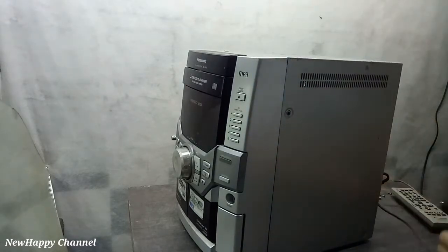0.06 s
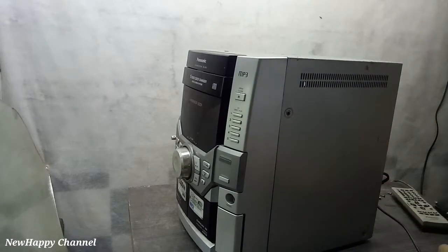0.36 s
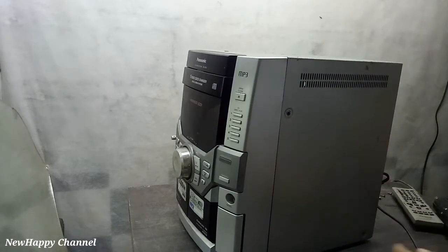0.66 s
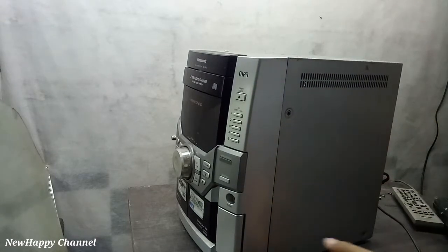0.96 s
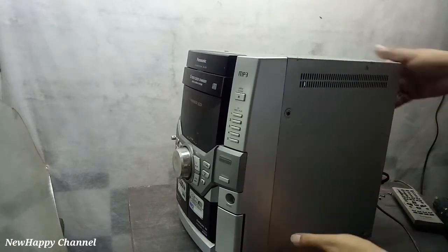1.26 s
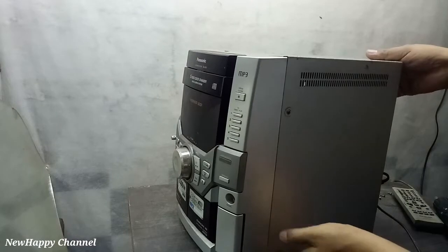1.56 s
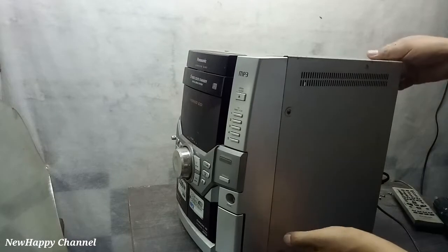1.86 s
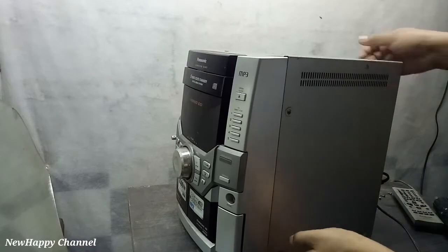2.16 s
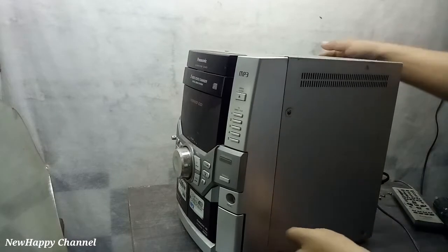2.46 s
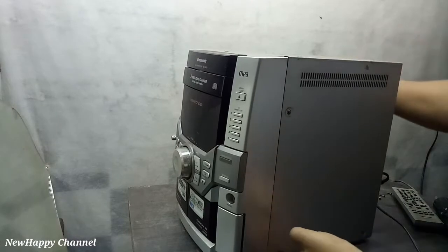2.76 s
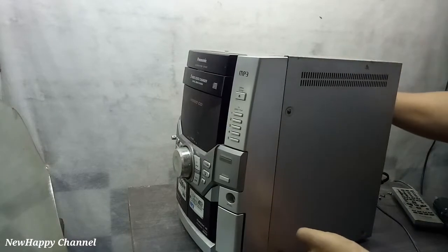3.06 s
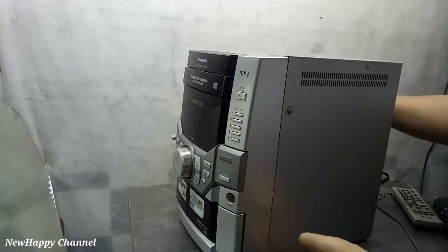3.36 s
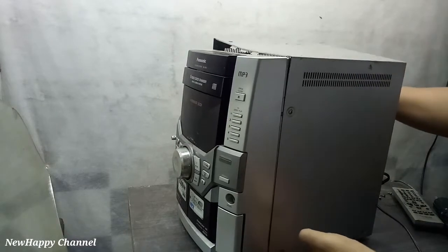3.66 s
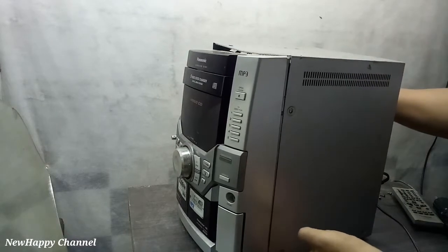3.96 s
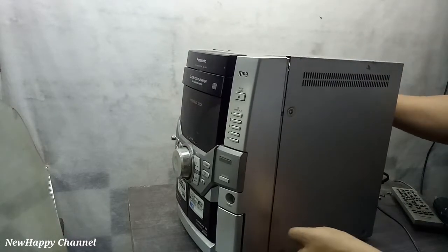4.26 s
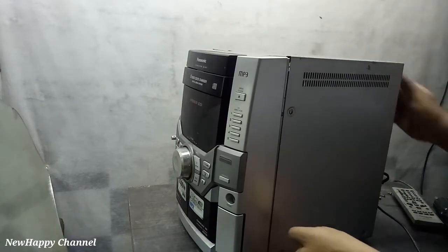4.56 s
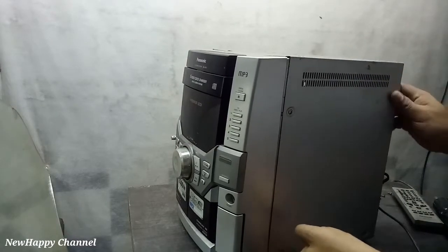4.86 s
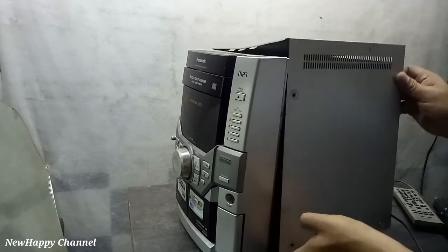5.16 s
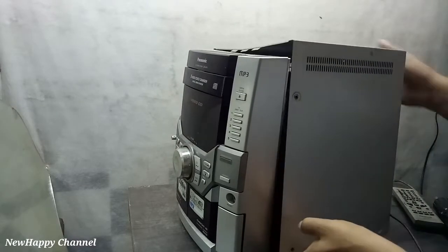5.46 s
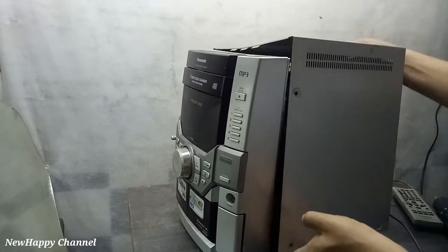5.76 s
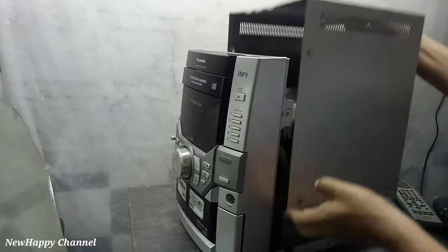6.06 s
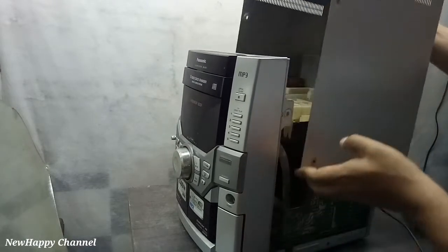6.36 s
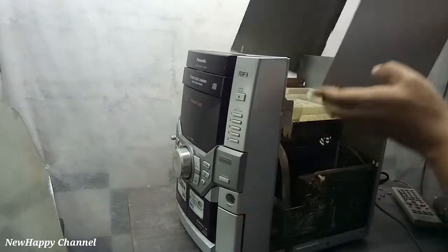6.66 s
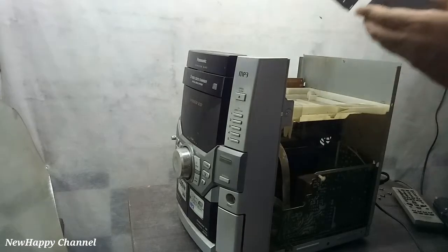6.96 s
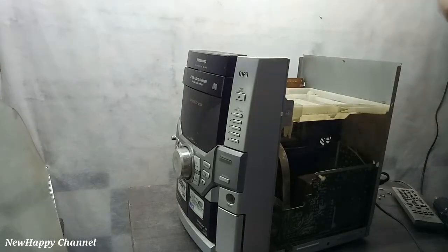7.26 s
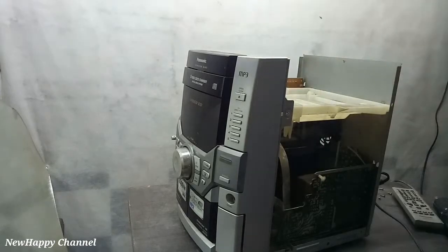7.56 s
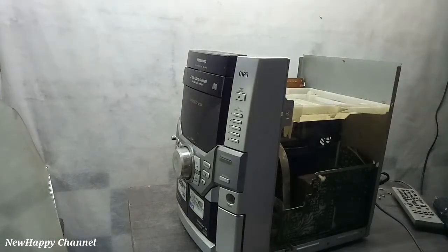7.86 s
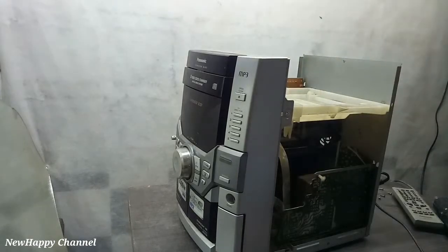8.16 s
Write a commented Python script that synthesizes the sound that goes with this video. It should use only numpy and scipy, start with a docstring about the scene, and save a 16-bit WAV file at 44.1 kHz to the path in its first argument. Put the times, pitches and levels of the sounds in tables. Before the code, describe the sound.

In a small, hard-walled room, something is set down on a workbench with a few knocks. Hands rub softly over a thin sheet-steel cabinet cover, then tug it so that it clanks and rattles in bursts, once leaving a panel singing. The cover breaks free, grates up the chassis, swishes clear and rings briefly with a low wobble. The sounds are close, slightly to the right, over faint room tone.

```python
"""A thin sheet-steel cover is worked loose from a cabinet on a workbench in a small, hard-walled room.
First something is put down, knocking on the bench; hands rub the cover and a fingertip squeaks.
From about 2.3 s the cover is tugged and clanks against its catches, plucking a chassis panel at 4.4 s.
At 6 s its edges break free and grate up the chassis, then it swishes over the back plate.
Just before 7 s it comes clear, flexes in the hands and rings on in the air over faint room tone."""
import sys
import numpy as np
from scipy import signal
from scipy.fft import rfft, irfft, next_fast_len
from scipy.io import wavfile
from scipy.ndimage import map_coordinates

SR = 44100
rng = np.random.default_rng(int(sys.argv[2]) if len(sys.argv) > 2 else 0)


def put_to_file(sound):
    """Save the sound as 16-bit audio at rate SR, in the file named by the first command-line argument."""
    columns = np.atleast_2d(sound).T  # one column per channel
    safe = np.clip(columns, -1, 1)
    whole_steps = np.round(safe * 32767)
    wavfile.write(sys.argv[1], SR, whole_steps.astype(np.int16))


N = 370877

# the cover's longest modes when it hangs free: f/Hz, level/dB, t60/s
COVER_MODES = [(231, -3, .7), (309, -2, .4), (354, -5, .35), (426, -2, .35), (561, -2, .6), (625, -3, .4),
               (787, -4, .4), (957, -3, .4), (1082, -10, .9), (1193, -3, .35), (1358, -13, 1.4),
               (1572, -5, .35), (1820, -5, .35), (1993, -1, .35), (2105, -7, .95), (2157, -5, .7),
               (2287, -4, .95), (2466, -7, .5), (2657, -5, .45), (2723, -5, .4), (2864, -7, .6),
               (3125, -9, .7), (3289, -8, .55)]
# EQ of the struck sheet: f/Hz, level/dB
STEEL_EQ = [(30, -46.5), (55, -25), (110, -9.5), (160, -3.5), (195, -9), (230, -1.5), (305, 0.5),
            (490, -10.5), (570, -13.5), (660, -14), (780, -9), (1200, -12), (1600, -14), (2600, -10.5),
            (3800, -24), (5200, -29.5), (6700, -34), (8200, -46.5), (15000, -52)]
# the cover hits the chassis: t/s, knock level before trim/dB, thump re knock/dB, clank re knock/dB,
# knock f/Hz, crash t60/s
COVER_BLOWS = [(1.744, -54.5, 4, 13.5, 1384, 0.064), (2.348, -42, -12, 10.5, 963, .33),
               (2.565, -48.5, -7, 0.5, 1170, 0.17), (2.586, -19.5, -5, -10.5, 1200, 0.27),
               (2.856, -46.5, -14, 1, 1160, 0.4), (3.002, -35, -5, -6.5, 950, 0.15),
               (3.535, -38.5, -1, 2, 1460, 0.14), (3.547, -27.5, -9.5, 4.5, 794, 0.15),
               (3.556, -15, -2, -2, 1195, 0.29), (3.66, -13.5, 0.5, -5.5, 890, 0.32),
               (3.691, -21, 2, -2, 1340, 0.079), (3.879, -40, -6.5, -10, 557, 0.17),
               (4.105, -34, 20, -21, 590, .1), (4.148, -22.5, 2, -8, 500, 0.2),
               (4.161, -11, 0.5, -11, 450, 0.31), (4.224, -14.5, -1, -10.5, 600, 0.29),
               (4.356, -19.5, -2, -5.5, 960, .22), (4.379, -6.5, -2.5, -6.5, 535, 0.059),
               (4.397, -14, -28, 0.5, 544, 0.2), (4.424, -15, 0, -1, 582, 0.56),
               (4.715, -26, -4.5, -8, 478, 0.22), (5.088, -30, 1.5, -4.5, 1410, 0.43),
               (5.172, -11, -8, -9, 1060, 0.17), (5.217, -12, -11.5, -4.5, 1080, .17),
               (5.235, -15.5, -2.5, -14, 980, 0.59), (5.449, -12.5, 4, -10, 452, .15),
               (5.472, -15.5, -13, -6, 627, 0.47), (6.028, -25.5, -15, -4, 1310, 0.29),
               (6.055, -10.5, -13.5, 2, 1180, 0.25), (7.198, -54.5, -2, 5.5, 1360, 0.24)]


def cover_blows():
    """A crack at the contact and a crash of crowded plate modes; hands and chassis damp the long modes."""
    out, t = np.zeros(N), np.arange(SR * 2 // 3) / SR
    trim_db, spot_spread = -12, 0.083  # spread: share by which resonances shift with the struck spot
    modes = ringing(COVER_MODES, t, damping=1.61)
    crowd = crowded_modes(t, t60_at_2khz=0.36)
    boom = norm(bench_boom(t))
    for s, db, thump_db, clank_db, knock_hz, crash_t60 in COVER_BLOWS:
        contact = burst(t, t60=0.015) + amp(-2.5) * burst(t, t60=crash_t60) + amp(-18) * excited(crowd)
        contact *= 1 - np.exp(-t / 0.0027)  # a glancing edge bites gradually
        blow = norm(coloured(uneven(contact, depth_db=3), STEEL_EQ)) + amp(-10.5) * excited(modes)
        blow += amp(-18) * boom  # the cabinet passes the shock on to the bench
        thump_hz, clank_hz = np.array([307, 1920]) * np.exp(spot_spread * rng.standard_normal(2))
        blow = resonant(blow, [thump_hz, knock_hz, clank_hz], q=12, boost=1)
        sound = in_room(blow, wet_db=-4, build_s=0.0075)
        sizzle_db = -46.5 + grown(db + clank_db) - db
        add(out, s, voiced(sound, db + trim_db, thump_db, clank_db, sizzle_db, skid_s=0.0075))
    return out


def crowded_modes(t, t60_at_2khz, count=150):
    """The sheet's many lesser modes, dying sooner the higher they lie."""
    hz = 500 + 13000 * ((np.arange(count) + rng.random(count)) / count) ** 2
    return ringing([(f, 0, t60_at_2khz * (f / 2000) ** -.15) for f in hz], t)


# EQ of a grating steel edge and of sheet sliding on sheet: f/Hz, level/dB
GRATE_EQ = [(30, -44.5), (70, -18), (120, -10), (190, -12.5), (260, -8.5), (370, 1), (480, -8.5),
            (580, -2.5), (760, -13), (1200, -9.5), (1650, -15), (2050, -12), (3400, -20.5), (5200, -29),
            (6600, -30.5), (8500, -37.5), (15000, -40)]
SWISH_EQ = [(35, -53.5), (100, 6), (230, -8), (335, -11), (560, -19.5), (950, -13.5), (1570, -6), (2400, 2),
            (3300, -1.5), (5300, -15.5), (6700, -16.5), (9000, -23), (15000, -21.5)]
# band mix, a row each for thump, knock, clank, sizzle: level/dB, growth/(dB per dB of pressure or speed)
GRATE_MIX = [(-22, 1.5), (-21.5, 1.15), (-20, 1.24), (-38.5, 2.07)]
SWISH_MIX = [(-55, 0.4), (-32, 1), (-25.5, 1.5), (-37.5, 1.67)]


def lift_scrape():
    """The edges break loose and grate ever more lightly; the cover then swishes over the back plate."""
    out, t = np.zeros(N), np.arange(5.9, 7.5, 1 / SR)
    pressure_db = swell(t - 6.07, hold_s=0.27, rise_s=0.092, release_s=0.76, sag_db_per_s=17.5)
    speed_db = swell(t - 6.83, hold_s=0.067, rise_s=1, release_s=0.47, sag_db_per_s=23)
    grate = [amp(db + growth * pressure_db) for db, growth in GRATE_MIX]
    swish = [amp(db + growth * speed_db) for db, growth in SWISH_MIX]
    add(out, t[0], friction(grate, GRATE_EQ, slips_per_s=1200, spread_db=5.5, ring_db=-9))
    add(out, t[0], friction(swish, SWISH_EQ, slips_per_s=2600, spread_db=2, ring_db=-24))
    return out


def friction(band_gains, eq, slips_per_s, spread_db, ring_db, hop=3072):
    """Uneven little slips ring the sheet, and other modes answer as the contact travels."""
    t, grain = np.arange(SR // 4) / SR, 2 * hop
    modes = ringing(COVER_MODES, t, damping=0.83)
    sound = np.zeros(len(band_gains[0]) + grain)
    for start in range(0, len(sound), hop):
        slips = (rng.random(grain) < slips_per_s / SR) * amp(spread_db * rng.standard_normal(grain))
        slips = norm(slips * rng.choice([-1, 1], grain) * np.hanning(grain))
        crash = uneven(burst(t, t60=0.0095) + amp(-2.5) * burst(t, t60=0.096), depth_db=1)
        plate = norm(coloured(crash, eq)) + amp(ring_db) * excited(modes)
        add(sound, start / SR, signal.fftconvolve(slips, plate))
    sound = in_room(sound, wet_db=-0.5, build_s=.01)
    return sum(gain * unit(band[grain:]) for gain, band in zip(band_gains, split_bands(sound)))


# the chassis panel's ring: f/Hz, level/dB, t60/s
PANEL_MODES = [(230, -29, 0.94), (460, -48.5, 4.6), (550, -43, 0.77), (730, -23.5, 1.53), (787, -31, 1.3),
               (1037, -32, 1.14), (2370, -36, .55), (2540, -25.5, .6), (2622, -30.5, 0.36)]


def panel_pluck():
    """The cover plucks a chassis panel as it slips past, and the undamped steel sings on."""
    out, t = np.zeros(N), np.arange(SR) / SR
    fade_out = np.minimum(1, (1 - t) / .2)
    add(out, 4.385, amp(-0.5) * ringing(PANEL_MODES, t).sum(axis=0) * fade_out)
    return out


# the freed cover is set ringing: t/s, level/dB
FREE_RINGS = [(6.849, 1.5), (7.199, -29)]


def free_rings():
    """Held in the air, the cover rings on; its pitches waver as the sheet flexes."""
    out, t = np.zeros(N), np.arange(SR) / SR
    attack = 1 - np.exp(-t / 0.006)
    for s, db in FREE_RINGS:
        sway = map_coordinates(rng.standard_normal(40), [t * 25])
        bent_time = t + np.cumsum(.003 * sway) / SR
        ring = excited(ringing(COVER_MODES, bent_time), scatter_db=2)
        add(out, s, amp(db) * in_room(ring * attack, wet_db=-4.5, build_s=0.019))
    return out


# the loose sheet wobbles in the hands: t/s, hold/s, f/Hz, level/dB
FLEXES = [(6.855, 0.045, 230.5, -33), (7.01, 0.058, 229, -44), (7.11, 0.041, 151, -48),
          (7.21, .11, 159.6, -54)]


def sheet_flexes():
    """Each flex sounds a low bending note that sinks as the sheet's sides relax."""
    out, t = np.zeros(N), np.arange(-.05, .3, 1 / SR)
    sink_hz_per_s = 230
    for s, hold_s, hz, db in FLEXES:
        level_db = db + swell(t, hold_s, rise_s=0.017, release_s=0.043, sag_db_per_s=27)
        note = np.sin(2 * np.pi * np.cumsum(hz - sink_hz_per_s * t) / SR)
        add(out, s + t[0], amp(level_db) * note)
    return in_room(out, wet_db=-11, build_s=0.007)


# EQ of the bench top: f/Hz, level/dB
BENCH_EQ = [(29, -60.5), (50, -42.5), (113, -6), (196, -0.5), (227, 0), (310, 2), (413, -9), (538, -25),
            (607, -16.5), (981, -19.5), (1190, -11), (1590, -21), (2380, -21), (7920, -76), (15500, -65.5)]
# its short ring: f/Hz, level/dB, t60/s
BENCH_MODES = [(397, 1.5, 0.19), (577, 0.5, 0.075), (1174, -1, 0.13), (1570, -13.5, .08)]
# hits on the bench: t/s, knock level before trim/dB, thump re knock/dB, clank re knock/dB,
# sizzle re knock/dB, knock f/Hz
BENCH_KNOCKS = [(0.156, -11.5, -10, -16, -63, 676), (0.252, -23, -15, -10.5, -54, 640),
                (0.565, -25.5, -1, -15.5, -59, 1250), (0.588, -27, 4, -7.5, -59, 520),
                (0.684, -8, -5, -13, -31.5, 616.5), (0.721, -21.5, 1, -16, -51, 464)]


def bench_knocks():
    """Tight knocks on the bench top, which then booms briefly under its load."""
    out, t = np.zeros(N), np.arange(SR * 2 // 3) / SR
    trim_db, thump_hz = -7.5, 437
    modes = ringing(BENCH_MODES, t)
    for s, db, thump_db, clank_db, sizzle_db, knock_hz in BENCH_KNOCKS:
        contact = burst(t, t60=0.048) + amp(-6) * burst(t, t60=.13)
        blow = norm(coloured(uneven(contact, depth_db=2.5), BENCH_EQ)) + amp(-13.5) * excited(modes)
        blow = resonant(blow, [thump_hz, knock_hz], q=5.6, boost=2.6)
        sound = in_room(blow, wet_db=-5, build_s=0.015)
        add(out, s, voiced(sound, db + trim_db, thump_db, clank_db, sizzle_db, skid_s=.0003))
        boom_db = -49 + grown(db + thump_db)
        add(out, s, amp(boom_db) * in_room(bench_boom(t), wet_db=-7.5, build_s=0.02))
    return out


def bench_boom(t, hz=120):
    """The bench top bounces as a whole under a blow, over in a few cycles."""
    attack = 1 - np.exp(-t / 0.014)
    return unit(np.sin(2 * np.pi * hz * t) * amp(-60 * t / 0.084) * attack)


# EQ of fingers on the cover: f/Hz, level/dB
SKIN_EQ = [(35, -63.5), (60, -22), (191, -19), (280, 1), (396, -6), (428, -7.5), (642, -12.5), (825, -12.5),
           (1060, -14.5), (1170, -9.5), (1260, -20), (2470, -14), (6000, -63.5), (7800, -86.5),
           (13200, -120)]
# hand moves: full-pressure t/s, hold/s, knock level/dB, thump re knock/dB, clank re knock/dB
HAND_RUBS = [(0.381, 0.14, -51.5, 9.5, -6.5), (1.371, 0.14, -36.5, 0, -10), (1.641, 0.099, -63.5, 8.5, 0.5),
             (2.881, 0.15, -55, -22, -2), (3.041, 0.1, -67.5, 27.5, 9.5), (3.357, 0.036, -69, 10, 2),
             (3.751, 0.092, -34.5, 4, -9.5), (3.894, 0.0042, -34.5, 1, -8.5),
             (4.544, 0.21, -37, -1.5, -8.5), (4.893, .14, -46.5, -11.5, -4.5), (5.14, .03, -41.5, 8, -5),
             (5.732, 0.11, -72.5, 4, 14.5), (5.866, 0.013, -63.5, 9.5, -6), (6.574, .06, -49, 0, 2),
             (8.252, 0.045, -67, -3, 5.5)]


def hand_rubs():
    """Hands shift on the cover and ease it along its seat: soft friction with no sizzle band."""
    out, t = np.zeros(N), np.arange(-.12, .36, 1 / SR)
    for s, hold_s, db, thump_db, clank_db in HAND_RUBS:
        pressure_db = db + swell(t, hold_s, rise_s=0.17, release_s=0.27, sag_db_per_s=46.5)
        gains = [amp(pressure_db + band_db) for band_db in (thump_db, 0, clank_db)]
        add(out, s + t[0], friction(gains, SKIN_EQ, slips_per_s=480, spread_db=1, ring_db=-15.5))
    return out


# a fingertip squeaks on the steel: t/s, hold/s, level/dB
SQUEAKS = [(1.058, 0.039, -68.5), (1.319, .015, -51.5)]


def finger_squeaks(hz=2870, jitter=0.0299):
    """Skin sticks and slips fast and a little unevenly, giving a thin rough tone."""
    out, t = np.zeros(N), np.arange(-.1, .25, 1 / SR)
    for s, hold_s, db in SQUEAKS:
        waver = map_coordinates(rng.standard_normal(150), [(t - t[0]) * 400])
        tone = np.sin(2 * np.pi * np.cumsum(hz * (1 + jitter * waver)) / SR)
        level_db = db + swell(t, hold_s, rise_s=0.19, release_s=.2, sag_db_per_s=46.5)
        add(out, s + t[0], amp(level_db) * tone)
    return in_room(out, wet_db=-1, build_s=0.0092)


# reverb decay: f/Hz, t60/s
ROOM_DECAY = [(80, 0.23), (250, 0.42), (700, 0.22), (2500, 0.27), (5000, 0.57), (12000, 0.033)]


def in_room(x, wet_db, build_s):
    """x plus a fresh diffuse tail, which builds up as the near walls answer."""
    hz, t, noise = signal.stft(rng.standard_normal(SR // 2), SR, nperseg=256)
    decay = amp(-60 * t / along(ROOM_DECAY, hz)[:, None])
    tail = signal.istft(noise * decay, SR, nperseg=256)[1]
    tail *= 1 - np.exp(-(np.arange(len(tail)) / SR / build_s) ** 2)
    return x + amp(wet_db) * signal.fftconvolve(x, norm(tail))[:len(x)]


# EQ of the background bed: f/Hz, level/dB
ROOM_TONE_EQ = [(15, -60.5), (25, -26), (69, -5), (156, -7.5), (274, -12), (378, -10.5), (509, -21),
                (567, -14), (741, -21.5), (804, -18.5), (1050, -22), (2850, -25.5), (3830, -27.5),
                (4620, -36.5), (15500, -44)]


def room_tone():
    """A faint steady rush under everything."""
    return amp(-65) * unit(coloured(rng.standard_normal(N), ROOM_TONE_EQ))


# the thump, knock, clank and sizzle bands: low f/Hz, high f/Hz
BANDS = [(30, 450), (450, 1500), (1500, 4250), (4600, 17000)]


def split_bands(x):
    """x split into thump, knock, clank and sizzle."""
    return [signal.sosfilt(signal.butter(5, band, "bandpass", fs=SR, output="sos"), x) for band in BANDS]


def voiced(sound, db, thump_db, clank_db, sizzle_db, skid_s):
    """The hardness of a contact sets each band's level in the first 30 ms; the sizzle dies first."""
    t, onset = np.arange(len(sound)) / SR, SR * 3 // 100
    thump, knock, clank, sizzle = split_bands(sound)
    sizzle *= amp(-60 * t / 0.3)
    sizzle *= 1 - np.exp(-t / skid_s)  # it builds up while the contact skids
    gains = amp(db + np.array([thump_db, 0, clank_db, sizzle_db]))
    return sum(g * band / np.std(band[:onset]) for g, band in zip(gains, [thump, knock, clank, sizzle]))


def ringing(table, t, damping=1):
    """One dying sine for each mode: f/Hz, level/dB, t60/s."""
    return np.array([amp(db - 60 * damping * t / t60) * np.sin(2 * np.pi * hz * t)
                     for hz, db, t60 in table])


def excited(modes, scatter_db=3):
    """Every contact point drives the modes with its own strengths and signs."""
    strengths = amp(rng.normal(0, scatter_db, len(modes)))
    signs = rng.choice([-1, 1], len(modes))
    return norm((strengths * signs) @ modes)


def burst(t, t60):
    """A dying puff of noise: many short modes at once."""
    return norm(rng.standard_normal(len(t)) * amp(-60 * t / t60))


def uneven(x, depth_db, step_hz=130):
    """Each contact point favours its own patches of the spectrum."""
    hz = np.arange(0, SR / 2, step_hz)
    ripple_db = depth_db * rng.standard_normal(400)[:len(hz)]
    return coloured(x, np.column_stack([hz, ripple_db]))


def resonant(x, centres_hz, q, boost):
    """The spot that is struck stresses a few broad resonances."""
    return x + boost * sum(signal.lfilter(*signal.iirpeak(hz, q, SR), x) for hz in centres_hz)


def swell(t, hold_s, rise_s, release_s, sag_db_per_s):
    """Envelope in dB of one move: it peaks at t = 0 and sags while held; rise and release span 60 dB."""
    rise = np.maximum(-t, 0) / rise_s
    release = np.maximum(t - hold_s, 0) / release_s
    return -60 * (rise + release) - sag_db_per_s * np.clip(t, 0, hold_s)


def grown(db, growth=1.25, pivot_db=-21.5):
    """Gain in dB of a layer that grows faster than the blow itself."""
    return growth * (db - pivot_db)


def coloured(x, points):
    """x through a minimum-phase EQ: f/Hz, level/dB."""
    n = x.shape[-1]
    m = 2 * next_fast_len(n // 2 + 2048)
    gains = amp(along(points, np.fft.rfftfreq(m, 1 / SR)))
    cepstrum = irfft(np.log(gains + 1e-6))
    cepstrum[1:m // 2] *= 2
    cepstrum[m // 2 + 1:] = 0
    return irfft(rfft(x, m) * np.exp(rfft(cepstrum)), m)[..., :n]


def along(points, hz):
    """Reads a curve of (f/Hz, value) points on a log axis."""
    f, v = np.transpose(points)
    return np.interp(np.log(hz + 1), np.log(f + 1), v)


def add(track, s, sound):
    """Mixes a sound into the track at time s."""
    part = track[max(round(s * SR), 0):][:len(sound)]
    part += sound[:len(part)]


def amp(db):
    """Decibels to gain."""
    return 10 ** (np.asarray(db) / 20)


def unit(x):
    """Scaled to rms 1."""
    return x / np.sqrt(np.mean(x ** 2) + 1e-20)


def norm(x):
    """Scaled to energy 1."""
    return x / np.sqrt(np.sum(x ** 2) + 1e-20)


# stereo balance: f/Hz, left minus right/dB
BALANCE = [(60, -4), (200, -4.5), (700, -3.5), (1300, -3), (2400, 0.1), (4400, -1), (8000, -1.04)]
# diffuse stereo width: f/Hz, side level/dB
WIDTH = [(100, -26), (400, -27.5), (1100, -11.5), (2200, -22.5), (4000, -12), (7000, -20), (14000, -29)]


def scene():
    """The mix: lows and mids lean right; wall reflections differ a little between the sides."""
    mid = (bench_knocks() + cover_blows() + hand_rubs() + finger_squeaks() + lift_scrape()
           + panel_pluck() + free_rings() + sheet_flexes() + room_tone())
    scatter = burst(np.arange(SR // 4) / SR, t60=.16)
    side = coloured(signal.fftconvolve(mid, scatter)[:N], WIDTH)
    left = coloured(mid, [(hz, db / 2) for hz, db in BALANCE])
    right = coloured(mid, [(hz, -db / 2) for hz, db in BALANCE])
    return np.array([left + side, right - side])


def record(dry):
    """Soft clipping at full scale, then a brick-wall low-pass."""
    clipped = dry / (1 + dry ** 8) ** (1 / 8)
    m = next_fast_len(N + SR // 2)
    passband = np.fft.rfftfreq(m, 1 / SR) < 15500
    return irfft(rfft(clipped, m) * passband, m)[:, :N]


dry = scene()
out = record(dry)
put_to_file(out)
```